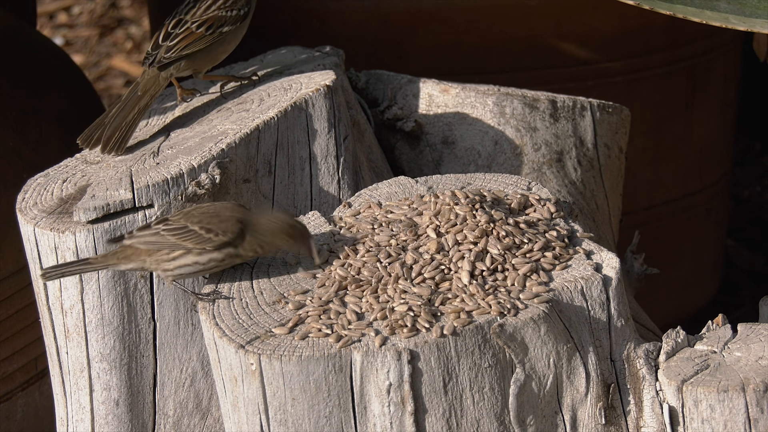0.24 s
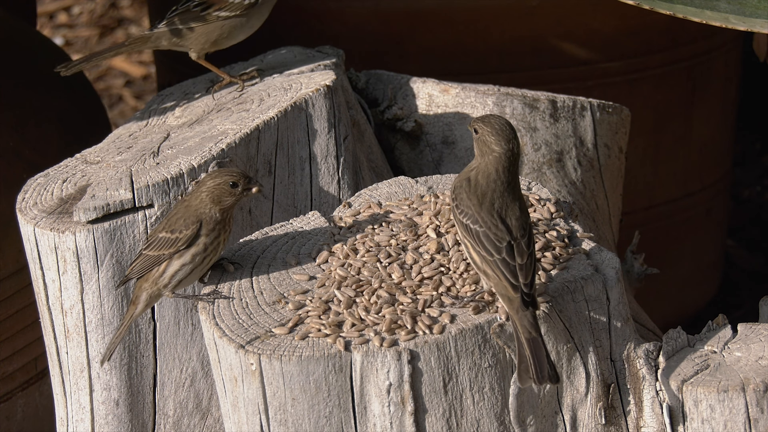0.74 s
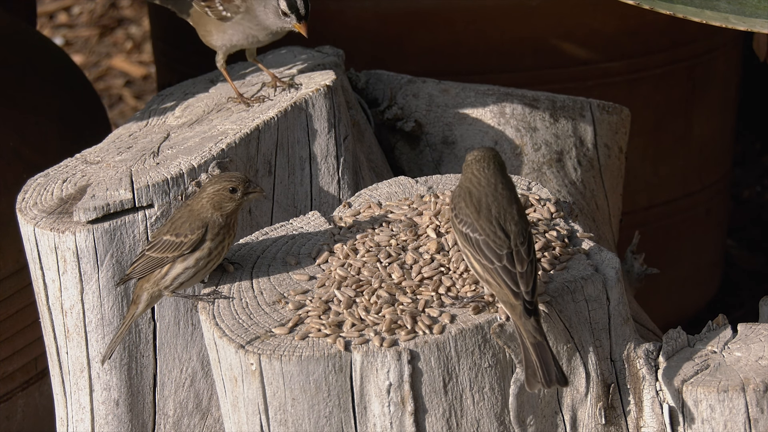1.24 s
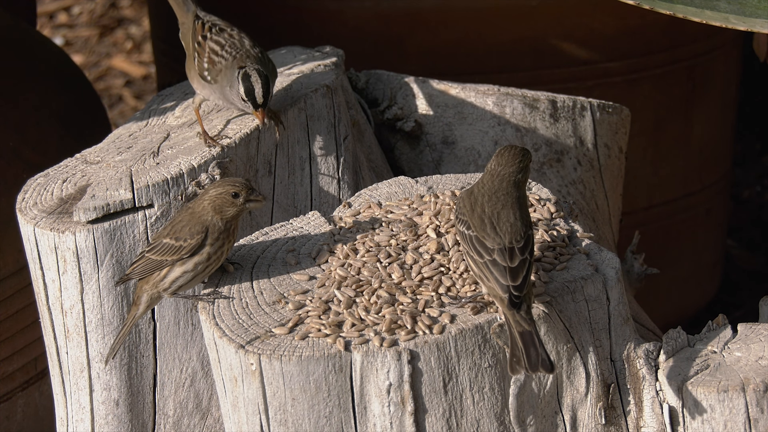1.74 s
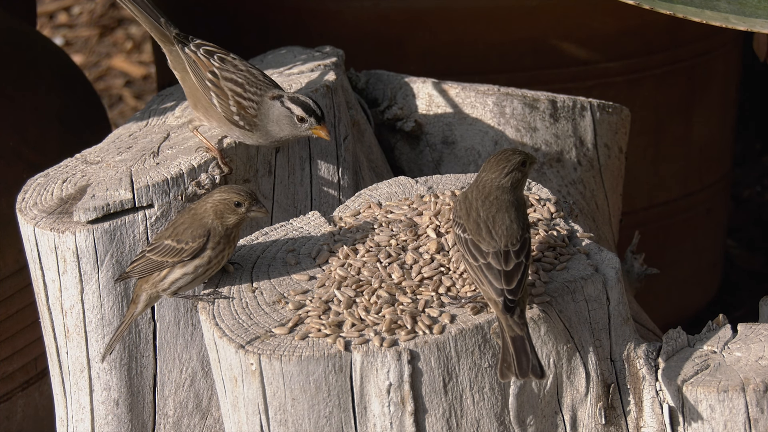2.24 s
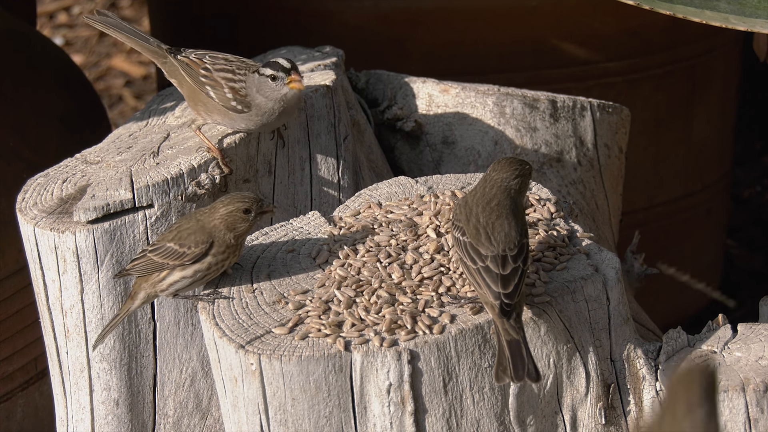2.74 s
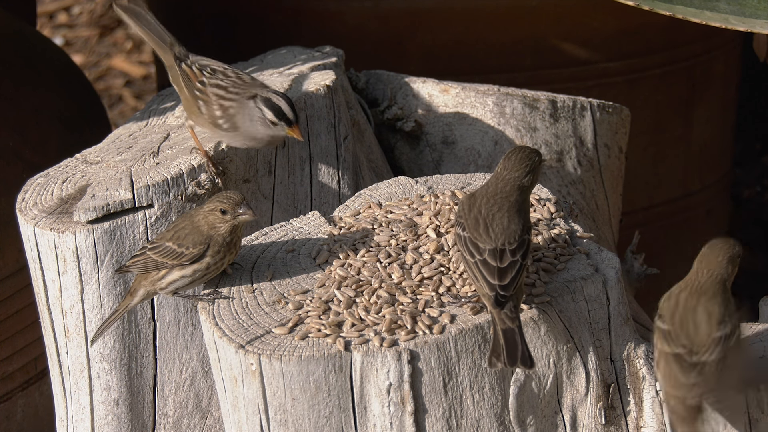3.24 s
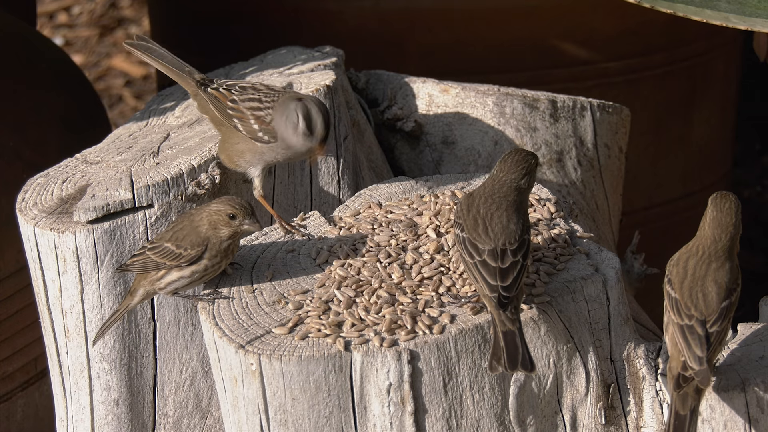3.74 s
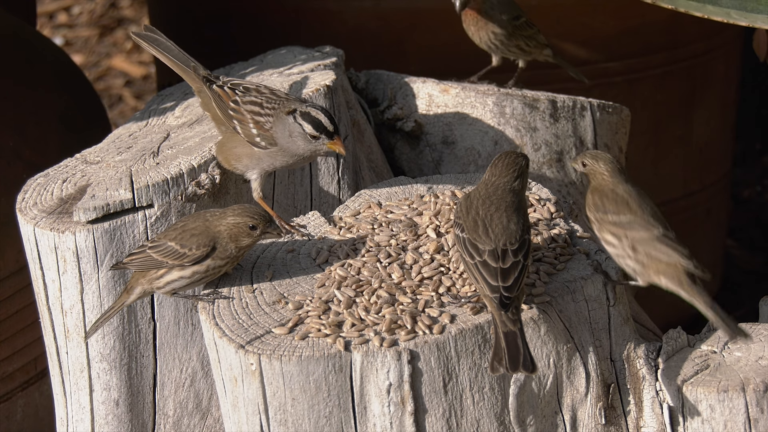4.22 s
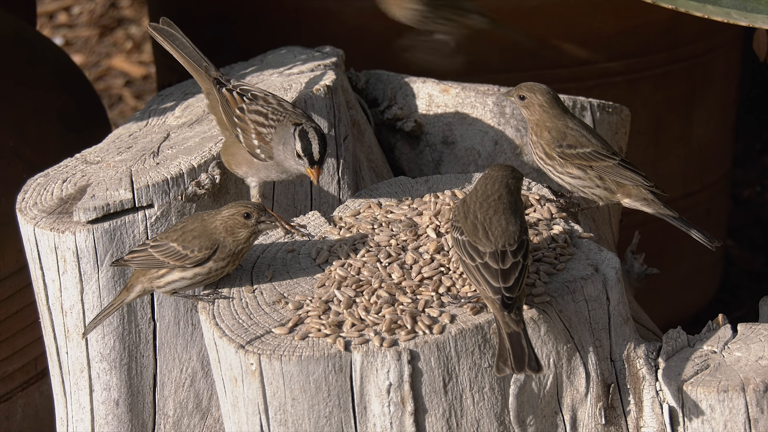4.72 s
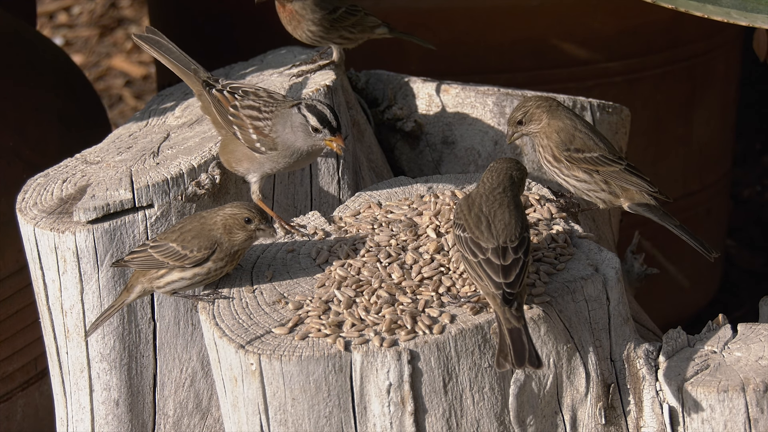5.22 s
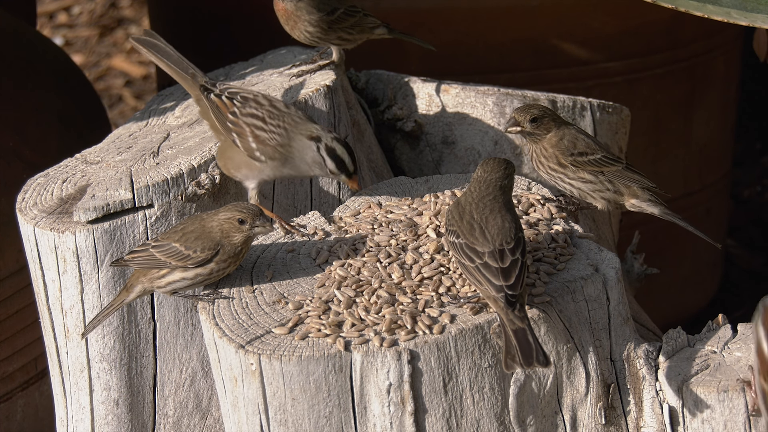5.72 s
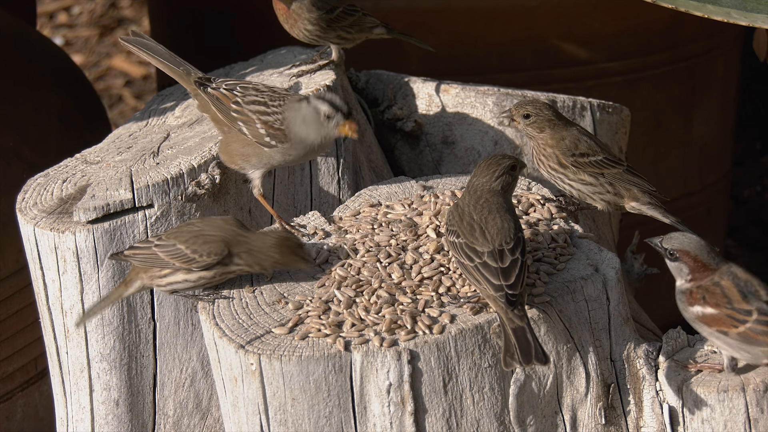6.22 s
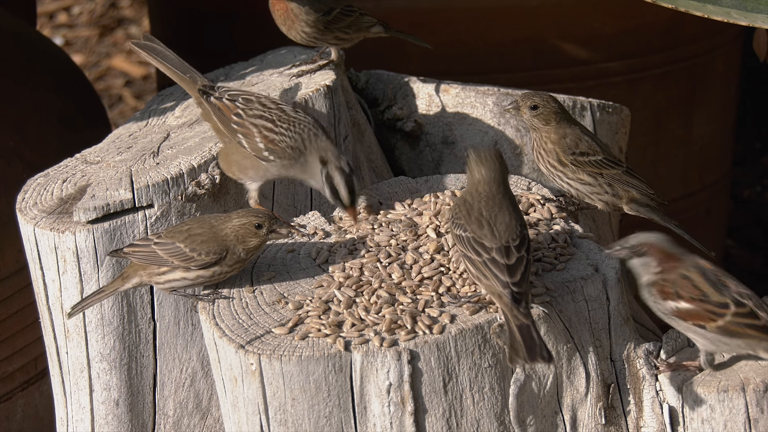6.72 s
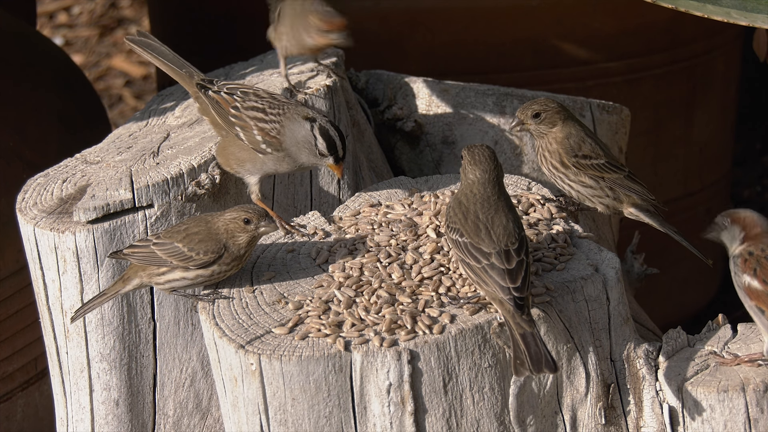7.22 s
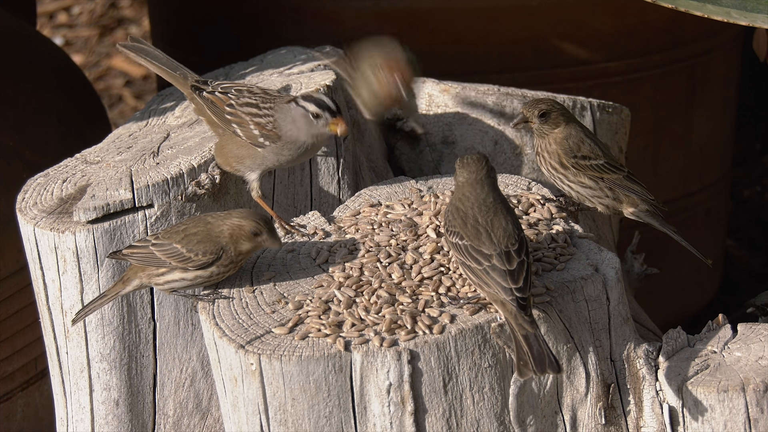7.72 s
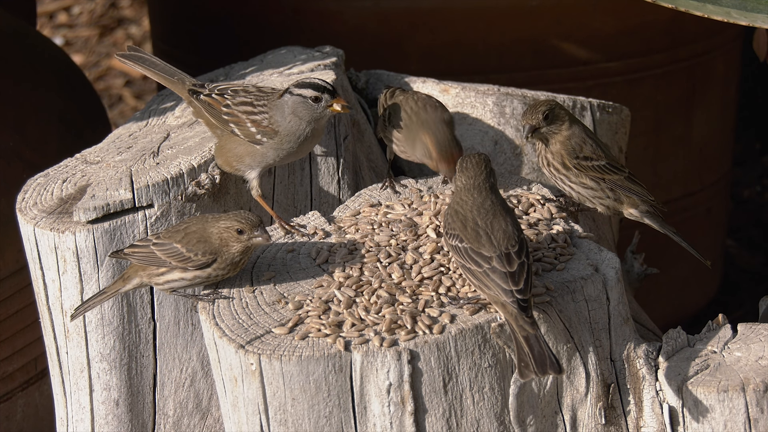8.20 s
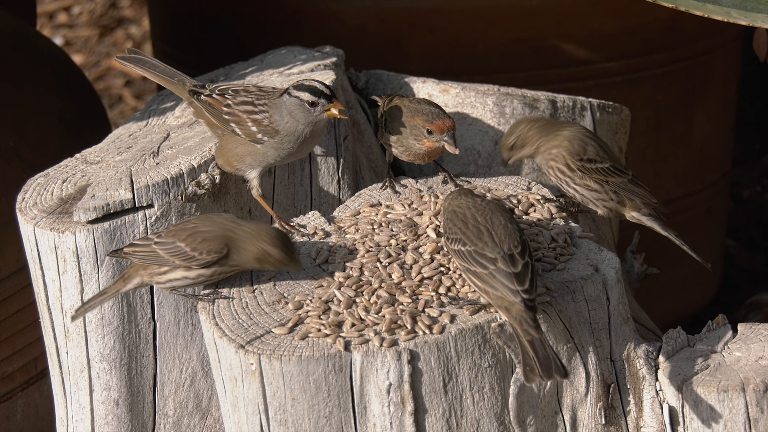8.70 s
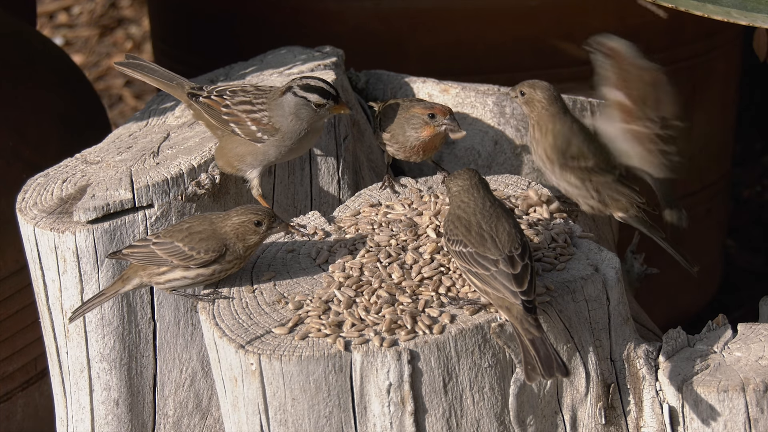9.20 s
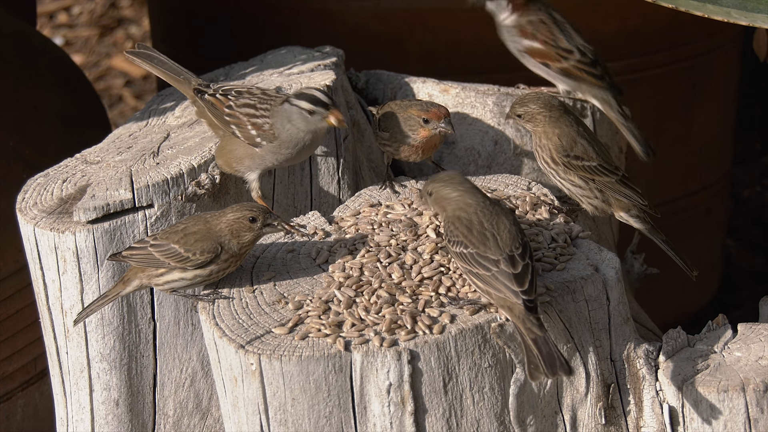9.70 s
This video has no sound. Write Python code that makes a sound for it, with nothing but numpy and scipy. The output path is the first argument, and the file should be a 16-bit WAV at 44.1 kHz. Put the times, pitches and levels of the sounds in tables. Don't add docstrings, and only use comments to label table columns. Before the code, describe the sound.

Small birds crowd a seed heap on a log, beaks cracking and ticking, feathers rustling, brief wing flutters, and short sharp high chirps over quiet air.

```python
import sys
import numpy as np
from scipy import signal
from scipy.fft import rfft, irfft
from scipy.io import wavfile
from scipy.ndimage import uniform_filter1d

SR = 44100
rng = np.random.default_rng(int(sys.argv[2]) if len(sys.argv) > 2 else 0)


def ratio_of_db(decibels):
    return 10 ** (np.asarray(decibels, float) / 20)


def unload_audio(sound):
    columns = np.transpose(np.atleast_2d(sound))
    steps = np.round(np.clip(columns, -1, 1) * 32767)
    wavfile.write(sys.argv[1], SR, steps.astype(np.int16))


N = 438794

# [f/Hz, density/dB per Hz]
HUSH_SPECTRUM = [(230, -42), (1320, -3.5), (2600, -6), (3500, -3.5), (5760, -8), (7880, -6.5),
                 (15000, -9.5), (16500, -24.5)]
HUSH_DB = -72.5
# [f/Hz, level/dB]
LINGERING_BANDS = [(3300, -67), (4250, -67), (6850, -79.5), (7750, -74), (8550, -72.5)]

# [t/s, length/s, level/dB, brightness/dB]
SHUFFLES = [(.266, 0.1, -54.5, 17), (.438, 0.13, -47.5, 10.5), (1.519, 0.028, -62.5, -17),
            (1.551, 0.068, -37, 19), (1.621, 0.059, -45.5, 9), (1.989, 0.16, -60, -13),
            (2.132, 0.071, -47.5, 10.5), (2.367, 0.091, -53, 4), (2.447, 0.068, -60.5, 4),
            (2.515, 0.071, -63, 7), (2.583, 0.037, -49.5, 8.5), (2.62, 0.2, -53, 0), (2.787, 0.018, -49, 3),
            (2.8, 0.06, -59, 6), (2.85, 0.21, -62, 0), (2.94, 0.37, -57.5, 3.5), (3.82, 0.23, -69.5, 9),
            (4.03, 0.034, -68.5, 3.5), (6.77, 0.086, -74.5, -0.5), (3.262, 0.13, -51, 9.5),
            (5.4, 0.1, -44.5, 8), (5.475, 0.063, -44, 6.5), (5.53, 0.16, -55.5, 9.5),
            (5.668, 0.092, -60.5, 13.5), (5.864, 0.076, -61.5, 3.5), (5.924, 0.078, -67.5, -12),
            (5.997, 0.079, -63, 3), (6.072, 0.027, -63.5, 0), (6.543, 0.1, -53.5, -6),
            (3.44, 0.11, -59, -3), (8.147, 0.12, -57.5, -4), (8.353, 0.057, -58.5, -23),
            (8.54, 0.15, -51, 11.5), (8.729, 0.16, -62, 11), (8.882, 0.12, -59, -8),
            (9.041, 0.14, -45.5, -4), (9.483, .015, -47, 9), (9.495, 0.13, -41.5, 13.5),
            (9.86, 0.11, -58.5, 5)]
# [f/Hz, level/dB]
RUSTLE_SPECTRUM = [(1300, -14), (1700, -0.5), (2700, 9.5), (4200, 17), (5600, 17.5), (7500, 16), (9500, -2),
                   (13000, 0.1)]
# [f/Hz, density/dB per Hz]
WING_AIR_SPECTRUM = [(88, -72), (230, -33), (550, -12.5), (1100, -6.5), (1750, 3), (2300, -2), (3250, -41),
                     (5500, -120)]
# [t/s, length/s, feathers/dB, brightness/dB, air/dB]
FLIGHTS = [
    (2.619, .167, -47, -3, -78),
    (2.937, .125, -50, 3.5, -86),
    (3.075, .208, -52, -1, -89),
    (5.218, .083, -55, -1.5, -84),
    (5.478, .05, -47, 3, -74),
    (5.597, .083, -52, 7.5, -90),
]
WINGBEAT_S, STROKE_S = .0417, .036
FLIGHT_FADE_DB = 1

# [t/s, peak/dB, ring f/Hz, spill/dB]
PECKS = [(.558, -27, 7240, -51.5), (0.907, -12, 8560, -52), (0.9528, -23, 6830, -54.5),
         (1.0042, -40, 8400, -50.5), (1.754, -43, 6300, -58.5), (1.797, -39, 10400, -54.5),
         (2.1154, -23, 6600, -52.5), (3.4286, -35, 9160, -51.5), (3.4917, -30, 7070, -53.5),
         (3.6476, -19.5, 7200, -60), (3.9061, -40, 10970, -59.5), (4.2117, -22, 8500, -55.5),
         (4.289, -33.5, 8970, -70), (4.4182, -20, 14900, -54.5), (4.4619, -24, 7800, -69),
         (5.1704, -15.5, 6680, -46.5), (6.256, -18.5, 7600, -50.5), (6.722, -42.5, 6040, -56.5),
         (6.96, -27, 6000, -49), (7.013, -40, 7900, -54), (7.585, -33, 15500, -58),
         (7.6892, -17, 8250, -47), (7.85, -20.5, 6600, -72), (8.2646, -29.5, 8940, -67),
         (9.2709, -26.5, 7840, -51), (9.3425, -20, 8830, -45)]
SPILL_LEAD_S, SPILL_S, SPILL_BRIGHT_DB, BRIGHT_DB_PER_OCTAVE = .0046, .038, 8, 7
# [t/s, peak/dB, ring f/Hz]
CLASHES = [(0.7705, -7.5, 3800), (0.7954, -15.5, 6460), (.8129, -19, 6300), (0.8195, -13, 3800),
           (0.8308, -18, 5640), (0.8636, -29, 5830), (0.8743, -9.5, 5000), (0.8938, -29, 5500),
           (0.921, -21.5, 5200), (1.552, -28.5, 5640), (1.566, -30, 4700), (1.582, -31, 5260),
           (1.6514, -29.5, 5300), (9.057, -25.5, 8160), (9.0719, -20.5, 7250), (9.1814, -36, 5300),
           (9.354, -38.5, 2300), (9.3624, -37, 8500)]
# [t/s, peak/dB, ring f/Hz]
HUSKS = [(0.498, -36, 6940), (2.1637, -28.5, 5500), (2.2788, -45.5, 6900), (2.4866, -37, 7300),
         (2.586, -34.5, 8000), (4.2143, -31, 3590), (2.6728, -28.5, 4100), (2.9613, -28.5, 7100),
         (3.1353, -28, 5500), (3.309, -28.5, 10800), (3.364, -35, 5400), (3.61, -18, 8000),
         (3.6492, -41, 2390), (3.9213, -36, 10300), (4.401, -37, 9000), (4.449, -34, 7530),
         (4.574, -43, 6380), (5.433, -30.5, 5850), (5.45, -38, 6030), (5.7066, -31.5, 8080),
         (6.0207, -41.5, 5570), (6.546, -35, 3880), (6.7397, -41, 5550), (6.9719, -23, 7560),
         (7.1866, -22.5, 7400), (7.634, -29, 5100), (7.703, -24.5, 6600), (8.955, -30, 8000),
         (9.539, -33, 10500), (9.8353, -26.5, 5300)]
# [t/s, peak/dB, ring f/Hz]
TICKS = [(0.6294, -65, 5100), (0.6644, -53, 7830), (0.6809, -55, 7850), (0.6994, -57, 8000),
         (0.9654, -40, 6860), (0.9757, -40, 6700), (0.989, -34.5, 6940), (1.157, -55, 7500),
         (1.2111, -49, 7600), (2.698, -35, 7590), (2.7065, -27, 7900), (3.8944, -50, 10540),
         (4.0173, -51.5, 11100), (4.0438, -43, 6700), (4.1023, -56, 8540), (4.156, -60, 5550),
         (4.1704, -44.5, 7600), (4.241, -53, 6140), (4.2787, -36, 8820), (4.3074, -43.5, 10950),
         (4.3336, -47, 7910), (4.3718, -43.5, 8000), (4.488, -39.5, 7700), (4.8509, -54.5, 8550),
         (5.051, -47.5, 7840), (5.0716, -50, 5500), (5.9112, -41.5, 8000), (5.9506, -39, 6950),
         (6.0334, -40.5, 5320), (6.086, -40, 6700), (6.2942, -38.5, 7150), (6.4263, -50, 5660),
         (6.4537, -60, 5960), (6.778, -49.5, 5990), (6.8685, -49, 7800), (8.308, -51.5, 9000),
         (8.63, -47, 8030), (8.6462, -42, 9000), (8.746, -42.5, 8600), (8.789, -46, 10400),
         (8.7944, -47, 6270), (9.2936, -35, 7950), (9.3538, -30, 8300), (9.404, -57, 8800),
         (9.4895, -36, 7700),
         (1.5273, -42, 6900), (1.729, -49, 3420), (1.771, -37, 8200), (1.8173, -46, 9600),
               (2.1337, -36.5, 4400), (2.183, -42.5, 4310), (2.3007, -55, 3270), (2.5282, -47, 8050),
               (2.6633, -30.5, 5080), (2.7444, -28, 6450), (5.275, -44, 6790), (5.382, -48.5, 8630),
               (5.796, -47, 10730), (7.1274, -56, 4100), (7.5012, -43, 3670), (7.5166, -52, 7730),
               (7.6037, -54.5, 3480), (7.894, -46.5, 3640)]
CLAP_START_S, CLAPS, CLAP_DB, CLAP_FADE_DB, CLAP_HZ = 2.627, 5, -28.5, 2, 7800
WOOD_BELOW_HZ, WOOD_WIDTH, HUSK_WIDTH = 3000, .04, .17

# [delay/call length,
# length/call length, first, middle, last f/call pitch, level/dB]
ARCH = [(0, 1.15, .87, 1.04, .9, 0.021), (.1, 0.96, 1.03, 1.175, 1.04, 0.0036)]
DIP = [(0, 1.05, 1.13, 1.0, 1.07, 0.0067), (.05, .8, 1.31, 1.185, 1.24, 0.012)]
RISE = [(.2, .8, .97, 1.0, .985, .5), (.16, .85, 1.21, 1.262, 1.25, -1), (0, .3, .7, .86, .99, -4),
        (.18, .65, 1.48, 1.52, 1.5, -14), (.3, .28, .74, .86, 1.0, -7.5), (.05, .2, 1.0, 1.13, 1.24, -10)]
CHIP = [(0, 1.0, 1.025, 1.0, .87, 0.0037), (.04, 1, 1.18, 1.1, 1.03, 0.015)]
SLIDE = [(0, 0.97, 1.13, 1.0, .83, 0.014), (.2, 0.92, 1.3, 1.16, 0.89, 0)]
HOOK = [(0, 0.9, 1.4, 1.0, 1, 0.0054), (.15, 0.99, 1.46, 1.17, 1.04, 0)]
STEP = [(0, .5, 1, 1.01, 0.96, -0.5), (.38, .5, 1.0, .86, .75, 2.5), (.78, .45, .76, .73, .72, -6.5)]
# [t/s, length/s, f/Hz, peak/dB, other side/dB (in STEPS: the drop)]
ARCHES = [
    (0.772, 0.045, 3690, -28.5, -0.5),
    (1.025, 0.045, 3690, -25, 1.5),
    (1.33, 0.037, 3800, -31, -1),
    (3.152, 0.05, 3620, -26, -0.5),
]
DIPS = [
    (1.424, 0.054, 3260, -46.5, -8.5),
    (2.207, 0.056, 3260, -46, -5),
    (8.875, 0.069, 3260, -37, -1),
    (9.51, 0.07, 3330, -32, 0.5),
]
RISES = [
    (1.636, 0.073, 3492, -41, -2),
    (2.018, 0.078, 3487, -41.5, 1.5),
    (2.948, 0.057, 3167, -38, -24),
    (3.253, 0.069, 3450, -35.5, 2.5),
    (6.557, 0.084, 3490, -38, -3),
    (9.102, 0.075, 3493, -34, 4.5),
]
CHIPS = [
    (1.562, .038, 3800, -36, -5),
    (7.253, 0.041, 4080, -35.5, -5.5),
    (7.693, 0.048, 4080, -34.5, -3.5),
    (7.998, 0.028, 4157, -33, -2.5),
    (8.388, 0.027, 4100, -35, -5),
    (8.575, 0.031, 4068, -28, -6.5),
]
SLIDES = [
    (1.86, 0.044, 3680, -58, -2.5),
    (1.911, 0.039, 3520, -58.5, -6),
    (7.193, 0.043, 3326, -45.5, -7),
    (7.849, 0.023, 3710, -46.5, 0),
    (7.977, 0.033, 3044, -38, -7.5),
    (8.197, 0.058, 3495, -51, -4),
    (8.446, 0.025, 3470, -50.5, -11),
    (8.717, 0.022, 3350, -49, -1.5),
    (9.478, 0.036, 3300, -39, -6),
]
HOOKS = [
    (7.007, 0.053, 3225, -45, -7),
    (7.413, .05, 3160, -44.5, 4.5),
]
STEPS = [
    (3.795, 0.029, 2925, -56, 0.47),
    (4.75, 0.037, 3020, -51, 0.4),
    (4.919, .044, 3420, -41, 2.1),
]
# [t/s, length/s, f/Hz, peak/dB,
# glide/f]
NOTES = [(0.524, 0.018, 3670, -51, 0.027), (0.753, 0.018, 7700, -44, .01), (0.751, .018, 6950, -46, .01),
         (.775, .04, 7000, -42.5, .01), (0.774, 0.065, 2080, -43, -0.04), (1.065, 0.022, 3420, -28, -0.03),
         (1.066, .017, 3830, -33, -0.02), (1.656, 0.022, 2910, -56, .26),
         (3.978, 0.017, 3125, -46, -0.0044), (2.955, 0.049, 3646, -38.5, 0.098),
         (4.789, 0.036, 2900, -53.5, -0.022), (4.954, 0.097, 3725, -52.5, -0.041),
         (4.779, 0.027, 3990, -62, -0.12), (5.178, 0.067, 6980, -44.5, -0.024),
         (5.244, 0.048, 6850, -51, 0.002), (5.469, 0.059, 1770, -42.5, -0.13),
         (5.511, 0.062, 1734, -57.5, -0.018), (5.398, 0.075, 3620, -66, .01),
         (5.6, .12, 3480, -68, -0.0063), (6.104, 0.033, 5060, -51.5, -0.021),
         (7.083, 0.022, 4080, -50.5, -0.034), (7.231, 0.047, 3404, -44.5, -0.049),
         (7.964, 0.02, 2850, -44.5, .37), (8.346, 0.027, 3010, -40.5, -0.045),
         (8.366, 0.023, 2624, -44.5, -0.48), (8.568, 0.013, 3170, -51, 0.52),
         (9.522, 0.045, 4520, -40, -0.02), (9.606, 0.042, 7680, -30, -0.045),
         (9.607, 0.045, 7020, -31, 0.015), (9.643, 0.018, 7950, -34, -0.02), (9.632, .045, 7350, -33, -.05),
         (9.087, .02, 4250, -47, .27), (9.178, .008, 5300, -31, .01), (8.379, .012, 3100, -50, .6),
         (9.464, .022, 4800, -49, -.17),
         (4.01, 0.018, 2384, -43, -0.13), (6.108, 0.072, 3650, -48, -0.24),
           (7.857, 0.025, 2860, -55, -.2), (9.452, 0.03, 4350, -52, 0.03),
           (7.22, 0.018, 1980, -64.5, 0.0082), (7.262, 0.016, 2450, -61, -.1)]
# [t/s, length/s, f/Hz, peak/dB, glide/f]
FAINT_WHISTLES = [(.505, 0.014, 3380, -58, 0.068), (.59, 0.079, 5100, -76, -0.053),
                  (1.268, 0.028, 4300, -66.5, -.05), (1.31, 0.043, 6580, -53, 0.079),
                  (3.84, 0.039, 3570, -76.5, -0.02), (4.782, 0.019, 3750, -60.5, -0.24),
                  (4.8, 0.04, 4150, -69, -.02), (4.83, 0.023, 2950, -64, -0.068), (5.99, 0.27, 5110, -66.5, .01),
                  (6.22, 0.3, 5140, -73, -0.01), (6.33, 0.2, 3830, -75, -0.01), (6.19, .17, 7010, -62.5, 0.035),
                  (6.62, .4, 3540, -71, 0.005), (6.8, 0.31, 2920, -82, -0.048), (6.82, .07, 7200, -65.5, .08),
                  (8.1, 0.2, 3960, -64.5, -0.036), (9.11, .06, 5300, -49, .01), (9.595, 0.026, 6580, -48, 0.25),
                  (8.866, 0.013, 2880, -57, 0.2)]
# [t/s, length/s, f/Hz, peak/dB, glide/f]
DRONES = [
    (2.626, .036, 2120, -53, -.04),
    (2.662, .022, 1950, -53, -.1),
    (2.704, .02, 1900, -55, -.1),
    (2.744, .045, 1650, -55, -.04),
    (3.113, .07, 2150, -58, .03),
]
# [from/s, to/s, extra/dB]
STRAIN = [(.7735, .7745, 9), (2.2, 2.25, 6), (1.63, 1.75, 4), (2.0, 2.13, 4), (2.6, 2.8, 9), (3.1, 3.15, 7),
          (6.1, 7.5, 7), (9.09, 9.17, 3), (9.45, 9.59, 8), (9.63, 9.7, 14)]
WAVER = .006
SUM_SHARE = .16
BUZZ_DB, BUZZ_IN_OVERTONES = -24, .15
WALL_S, YARD_T60_S, FAR_T60_S = .057, .2, 1.2
CUTOFF_HZ = 16400


def at_hz(points, hz):
    points_hz, level_db = np.transpose(points)
    return np.interp(np.log(hz), np.log(points_hz), level_db)


def rms_one(x):
    return x / np.sqrt(np.mean(x ** 2) + 1e-20)


def colour(x, spectrum):
    hz = np.arange(1, N // 2 + 2) * SR / N
    return rms_one(irfft(rfft(x) * ratio_of_db(at_hz(spectrum, hz)), N))


def band(x, low_hz, high_hz, order):
    sos = signal.butter(order, [low_hz, high_hz], "band", fs=SR, output="sos")
    return signal.sosfilt(sos, x)


def ring(x, hz, width_hz):
    r = np.exp(-np.pi * width_hz / SR)
    feedback = [1, -2 * r * np.cos(2 * np.pi * hz / SR), r * r]
    return signal.lfilter([(1 - r * r) / 2, 0, (r * r - 1) / 2], feedback, x)


def drift(rate_hz):
    steps = rng.standard_normal(int(N / SR * rate_hz) + 2)
    return np.interp(np.arange(N) / SR * rate_hz, np.arange(len(steps)), steps)


def pair(alike):
    mid, side = rng.standard_normal((2, N))
    return np.sqrt(1 + alike) * mid + np.sqrt(1 - alike) * side * [[1], [-1]]


def swells(rows, edge_s):
    out = np.zeros(N + SR)
    for start_s, length_s, db in rows:
        t = np.arange(int((length_s + .044) * SR)) / SR
        rise = np.minimum(t / (.18 * length_s), 1)
        fall = np.exp(-np.maximum(t - .79 * length_s, 0) / edge_s) * (1 - t / t[-1])
        out[int(start_s * SR):][:len(t)] += ratio_of_db(db) * rise * fall
    return out[:N]


def yard_hush():
    low = band(pair(.8), 60, 1400, order=2)
    high = band(pair(.031), 1400, 19000, order=2)
    return ratio_of_db(HUSH_DB) * colour(low + high, HUSH_SPECTRUM)


def lingering():
    t, noise = np.arange(N) / SR, pair(.28)
    bands = 0
    for hz, db in LINGERING_BANDS:
        bands = bands + ratio_of_db(db) * rms_one(band(noise, hz - 260, hz + 260, order=4))
    return bands * ratio_of_db(-18 * t) / (1 + (t / .5) ** 8)


def wing_beats():
    out = []
    for start_s, length_s, db, bright_db, air_db in FLIGHTS:
        for k, place in enumerate(np.linspace(-1, 1, round(length_s / WINGBEAT_S))):
            fade_db = FLIGHT_FADE_DB * place ** 2
            out.append((start_s + k * WINGBEAT_S, STROKE_S, db - fade_db, bright_db, air_db - fade_db))
    return out


def rustles():
    spills = []
    for s, _, hz, db in PECKS:
        bright_db = SPILL_BRIGHT_DB + BRIGHT_DB_PER_OCTAVE * np.log2(hz / 7500)
        spills.append((s - SPILL_LEAD_S, SPILL_S, db, bright_db))
    return SHUFFLES + [row[:4] for row in wing_beats()] + spills


def wing_air():
    puffs = swells([(s, length_s, db) for s, length_s, *_, db in wing_beats()], edge_s=.012)
    air = colour(pair(1.0), WING_AIR_SPECTRUM) * puffs * ratio_of_db(14.5)
    return band(air, 195.5, 3000, order=2)


def rustle(patchy_db):
    start_s, length_s, db, bright_db = np.transpose(rustles())
    dull_db = db - 10 * np.log10(1 + ratio_of_db(bright_db) ** 2)
    heap_floor = ratio_of_db(-94)
    dull = swells(zip(start_s, length_s, dull_db), edge_s=.014) + heap_floor
    bright = swells(zip(start_s, length_s, dull_db + bright_db), edge_s=.008)
    tick_size = ratio_of_db(2.5 * np.minimum(rng.exponential(1, N), 4))
    ticks = (rng.random(N) < 300 / SR) * tick_size
    grain = (.97 + signal.lfilter([1], [1, -.97], ticks)) * ratio_of_db(2.0 * drift(55))
    near = rms_one(pair(.5) * grain)
    wide = rms_one(pair(.17) * grain)
    out, edges_hz = 0, np.geomspace(1300, 16000, 16)
    for low_hz, high_hz in zip(edges_hz, edges_hz[1:]):
        treble = np.clip((low_hz - 6000) / 4000, 0, 1)
        flicker = ratio_of_db(at_hz(RUSTLE_SPECTRUM, low_hz) + patchy_db * drift(40))
        level = ((1 - treble) * dull + treble * bright) * flicker
        out = out + level * band(wide if treble > .6 else near, low_hz, high_hz, order=2)
    return out


def hits():
    claps = []
    for k in range(CLAPS):
        claps.append((CLAP_START_S + k * WINGBEAT_S, CLAP_DB + CLAP_FADE_DB * max(2 - k, 0), CLAP_HZ))
    return [row[:3] for row in PECKS] + CLASHES + HUSKS + claps + TICKS


def cracks(snap_s, splinter_s, splinter_db):
    out, t = np.zeros((2, N + 2000)), np.arange(1000) / SR
    contacts = hits()
    draws = rng.standard_normal((len(contacts), 2, len(t)))
    for (s, db, hz), (noise, chance) in zip(contacts, draws):
        splinters = ratio_of_db(splinter_db + 1.4 * chance) * np.exp(-t / splinter_s)
        burst = noise * (np.exp(-t / snap_s) + splinters)
        low_hz, high_hz = min(.7 * hz, 3200), min(1.9 * hz, 16000)
        if db < -38:
            low_hz, high_hz = .75 * hz, min(1.45 * hz, 16000)
        width = WOOD_WIDTH if hz < WOOD_BELOW_HZ else HUSK_WIDTH
        burst = band(.061 * burst + 9.6 * ring(burst, hz, width * hz), low_hz, high_hz, order=4)
        burst *= ratio_of_db(db) / np.abs(burst).max()
        for side, sign in enumerate((1, -1)):
            i = int(s * SR) + 1 - side * (chance[0] > -.4)
            out[side, i:i + len(t)] += ratio_of_db(sign * .49 * chance[1]) * burst
    return out[:, :N]


def whistles():
    out = []
    for s, length_s, hz, db, glide in NOTES + FAINT_WHISTLES + DRONES:
        out.append((s, length_s, hz * (1 - glide / 2), hz, hz * (1 + glide / 2), db))
    shapes = ((ARCH, ARCHES), (DIP, DIPS), (RISE, RISES), (CHIP, CHIPS), (SLIDE, SLIDES),
              (HOOK, HOOKS), (STEP, STEPS))
    for shape, calls in shapes:
        for s, length_s, hz, db, other_db in calls:
            for k, (delay, share, first, middle, last, strand_db) in enumerate(shape):
                level_db = db + strand_db + other_db * (k % 2)
                out.append((s + delay * length_s, share * length_s,
                            first * hz, middle * hz, last * hz, level_db))
    return out


def chirps(overtone_db, third_db, hoarse_db, breath_db):
    voice, octaves = np.zeros((2, N), complex)
    flutter = rms_one(band(rng.standard_normal((2, N)), 30, 260, order=3))
    waver = rms_one(band(flutter[0], 20, 70, order=2))
    for start_s, length_s, first_hz, middle_hz, last_hz, db in whistles():
        u = np.linspace(0, 1, int(length_s * SR))
        i = int(start_s * SR)
        span = slice(i, i + len(u))
        arc_hz = np.polyval(np.polyfit([0, .5, 1], [first_hz, middle_hz, last_hz], 2), u)
        hz = arc_hz * (1 + WAVER * waver[span])
        strain_db = sum(extra_db for since, until, extra_db in STRAIN if since <= start_s < until)
        rough_db = hoarse_db + strain_db - .45 * (db + 30) + 3 * (middle_hz < 2200)
        hoarse = ratio_of_db(min(rough_db, -5))
        shake = hoarse * ([1, 1j] @ flutter[:, span])
        swell = 1.5 if middle_hz > 1.08 * max(first_hz, last_hz) else .8
        tone = np.sin(np.pi * u ** swell) ** .7 * np.exp(2j * np.pi * np.cumsum(hz) / SR)
        strand = ratio_of_db(db) * tone * (1 + shake) / np.sqrt(1 + 2 * hoarse ** 2)
        voice[span] += strand
        octaves[span] += strand ** 2
    strength = uniform_filter1d(np.abs(voice), size=200)
    shape = voice / (strength + .028)
    beat = np.abs(shape) ** 2
    beat = beat - uniform_filter1d(beat, size=200)
    doubled = (SUM_SHARE * voice ** 2 + (1 - SUM_SHARE) * octaves).real / (strength + .028)
    beak = ring(doubled * (1 + BUZZ_IN_OVERTONES * beat), 7900, 4500)
    overtones = band(beak, 4000, 10500, order=4)
    thirds = band((voice * shape ** 2).real * flutter[0], 10000, 14000, order=3)
    breath = strength * band(rng.standard_normal(N), 5200, 9000, order=3)
    call = voice.real * (1 + ratio_of_db(BUZZ_DB) * beat) + ratio_of_db(overtone_db) * overtones
    call = call + ratio_of_db(third_db) * thirds + ratio_of_db(breath_db) * breath
    return band(call, 1500, 15000, order=4)


def yard(x, wall_db, near_db, far_db, top_hz):
    t = np.arange(SR // 2) / SR
    wall = ratio_of_db(wall_db) * np.exp(-((t - WALL_S) / .0012) ** 2)
    scatter = ratio_of_db(near_db - 60 * t / YARD_T60_S) * (1 - np.exp(-t / .001))
    far = ratio_of_db(far_db - 60 * t / FAR_T60_S)
    echo = band(pair(.66)[:, :len(t)] * (wall + scatter + far), 2300, top_hz, order=1)
    heard = signal.fftconvolve(x + np.zeros((2, 1)), echo, axes=1)[:, :N]
    sway = 1.6 * rms_one(band(rng.standard_normal(N), 20, 120, order=2))
    return np.array([np.interp(np.arange(N) + sway, np.arange(N), side) for side in heard])


def scene():
    calls = chirps(overtone_db=-4, third_db=-33, hoarse_db=-21, breath_db=-20)
    feeding = cracks(snap_s=.0006, splinter_s=.0057, splinter_db=-14.5)
    feeding = feeding + rustle(patchy_db=2) + wing_air()
    call_echoes = yard(calls, wall_db=-49, near_db=-42, far_db=-71, top_hz=8000)
    feeding_echoes = yard(feeding, wall_db=-56, near_db=-47.5, far_db=-78, top_hz=12100)
    return calls + feeding + call_echoes + feeding_echoes + lingering() + yard_hush()


def band_limit(x):
    return signal.sosfilt(signal.butter(12, 17140, fs=SR, output="sos"), x)


def record(dry):
    sos = signal.cheby2(12, 60, CUTOFF_HZ + 600, fs=SR, output="sos")
    mix = signal.sosfilt(sos, dry)
    return band_limit(mix)


dry = scene()
out = record(dry)
unload_audio(out)
```